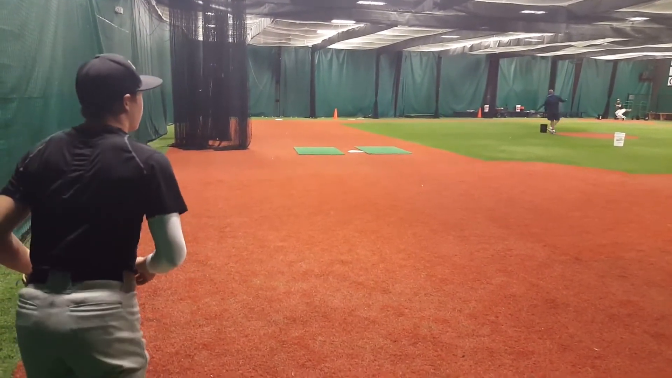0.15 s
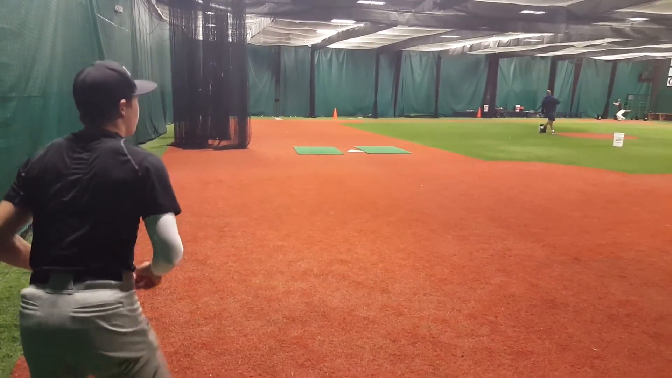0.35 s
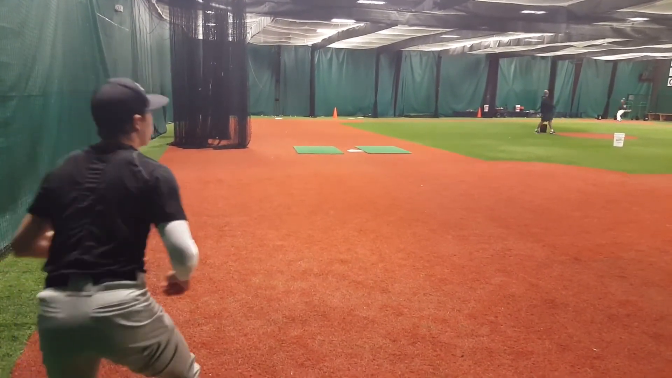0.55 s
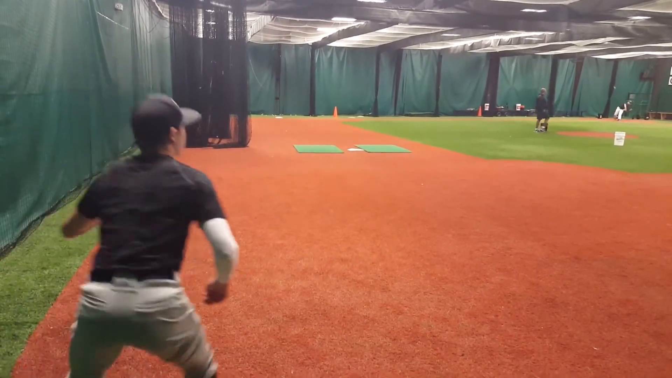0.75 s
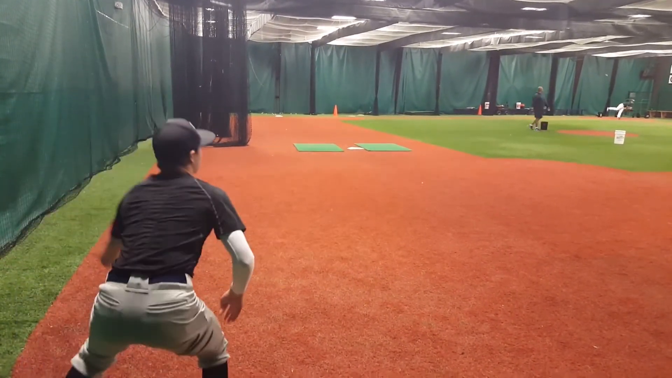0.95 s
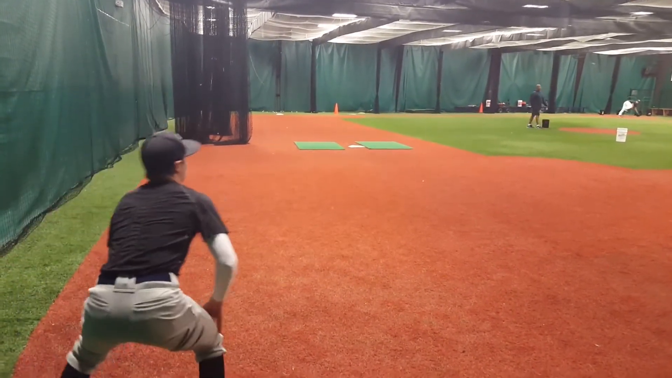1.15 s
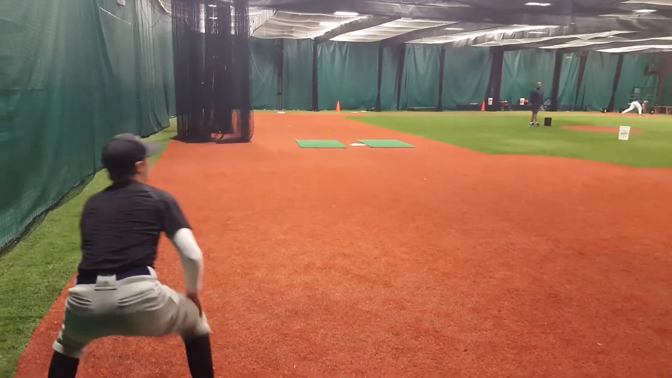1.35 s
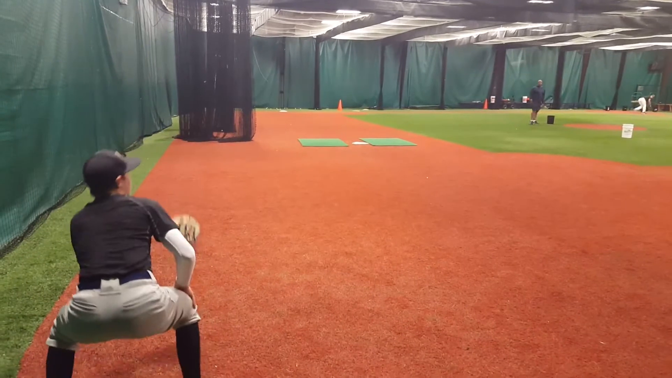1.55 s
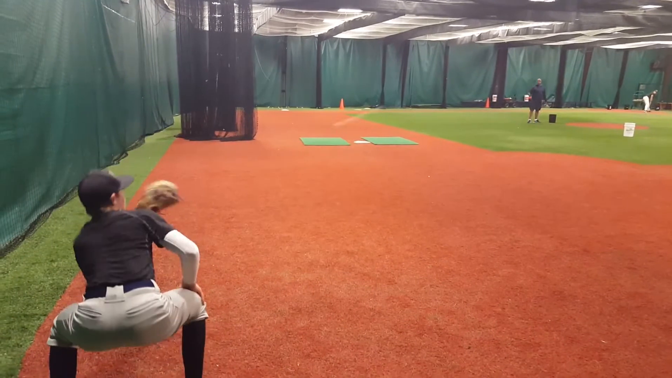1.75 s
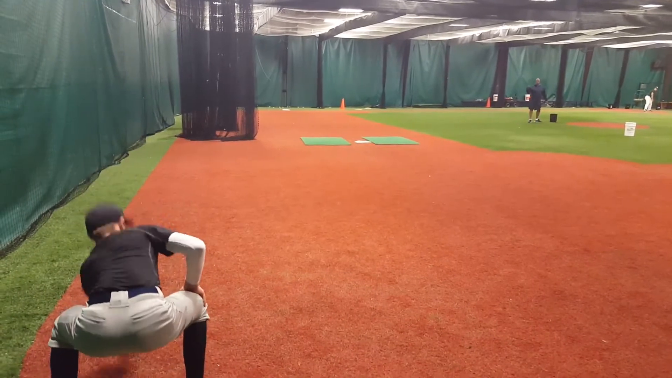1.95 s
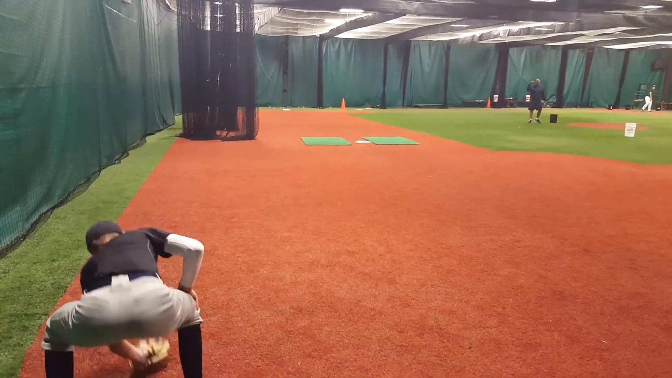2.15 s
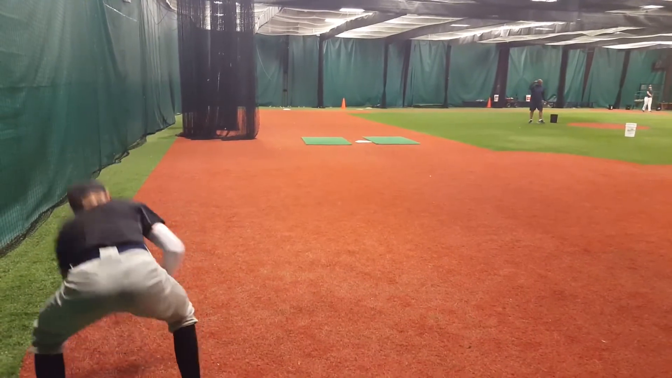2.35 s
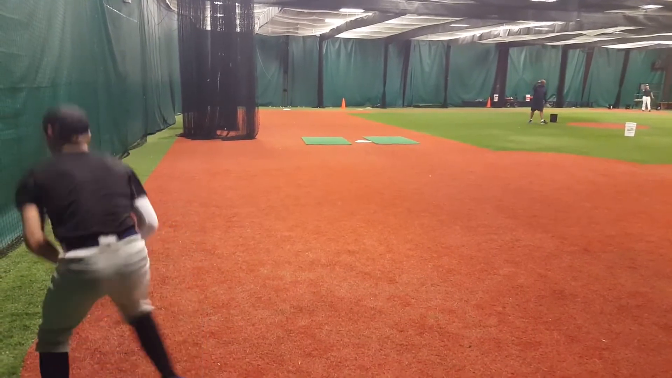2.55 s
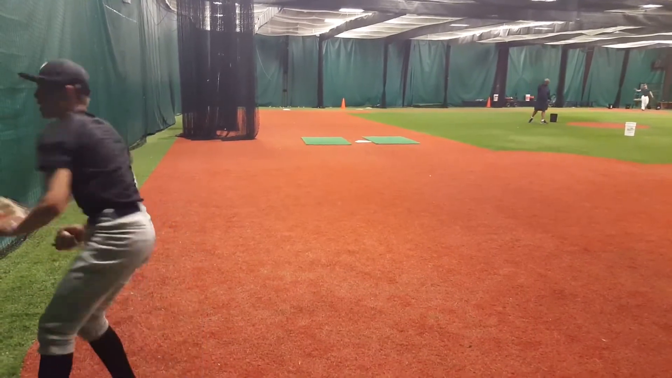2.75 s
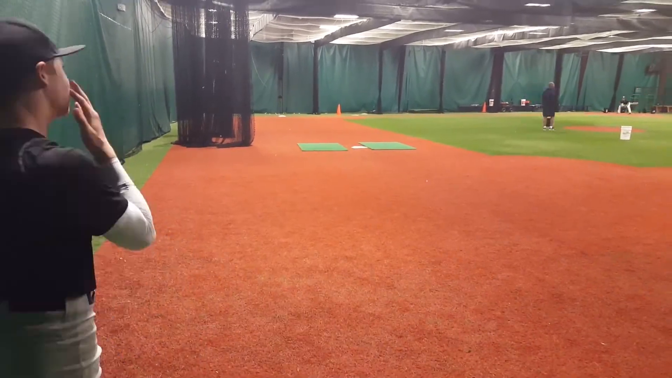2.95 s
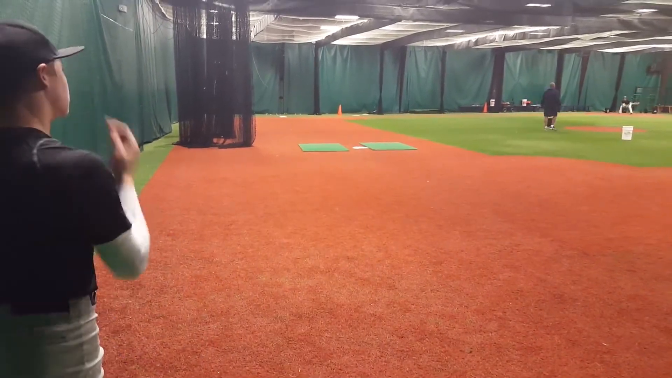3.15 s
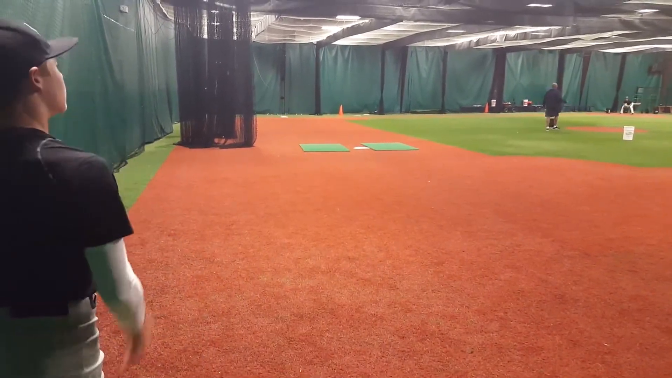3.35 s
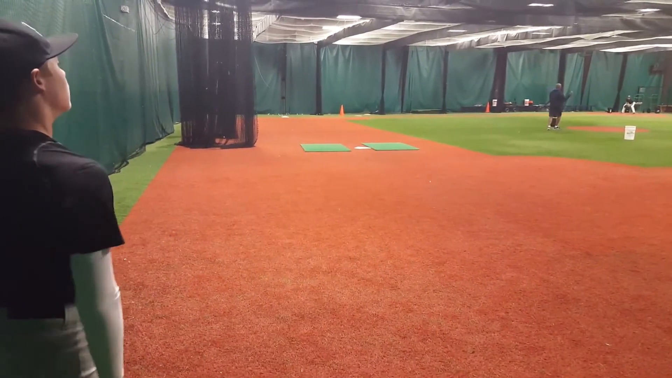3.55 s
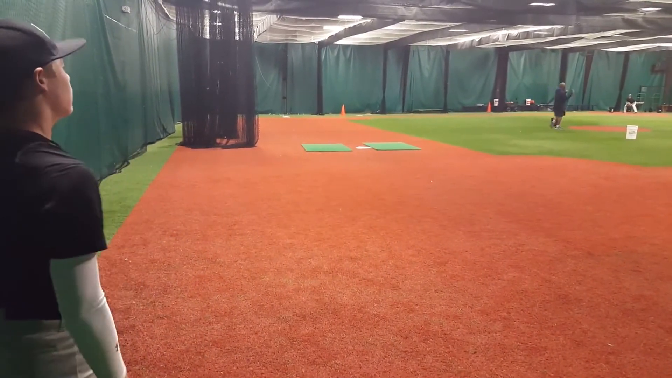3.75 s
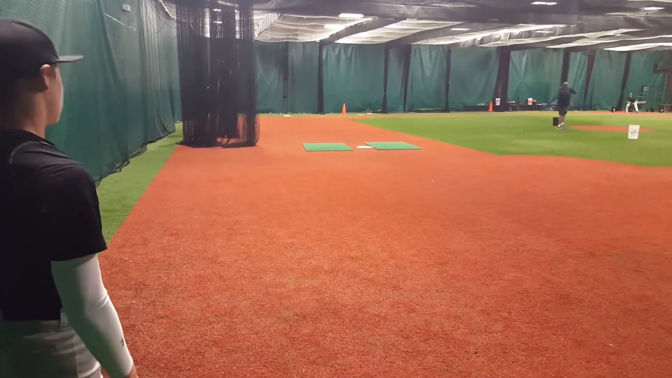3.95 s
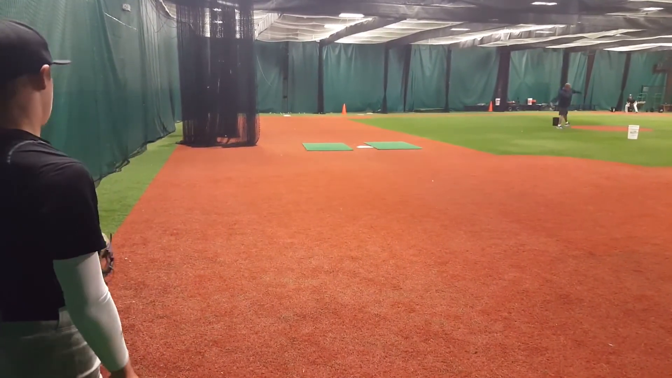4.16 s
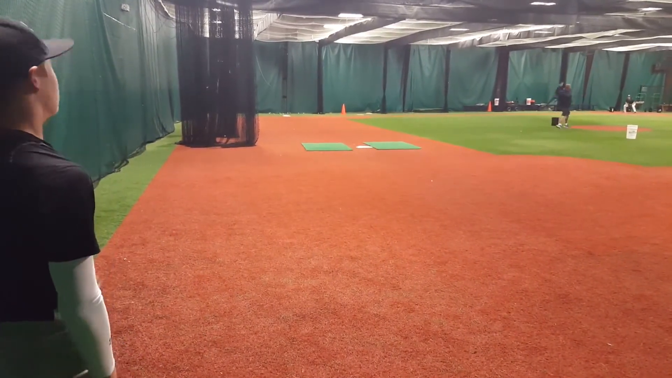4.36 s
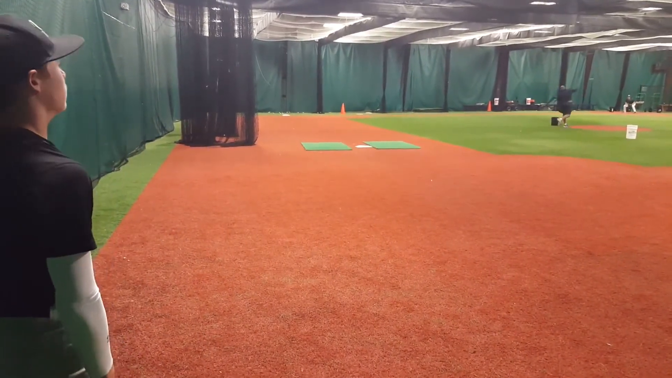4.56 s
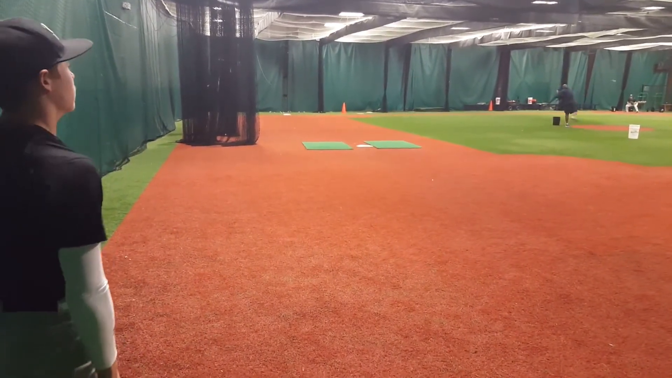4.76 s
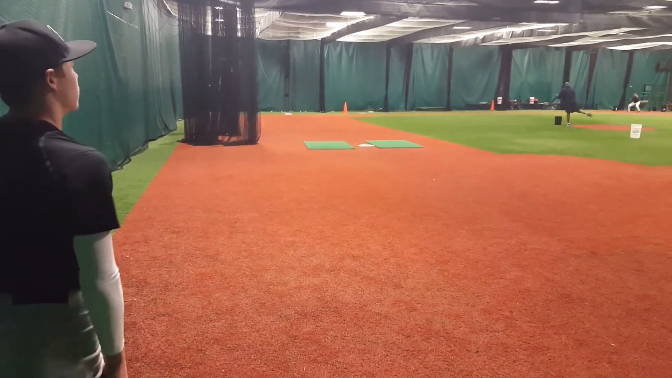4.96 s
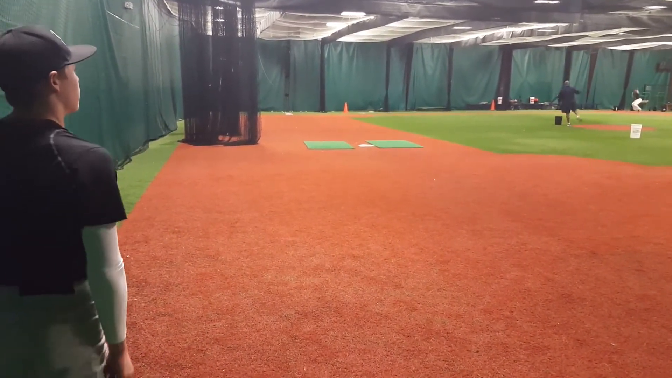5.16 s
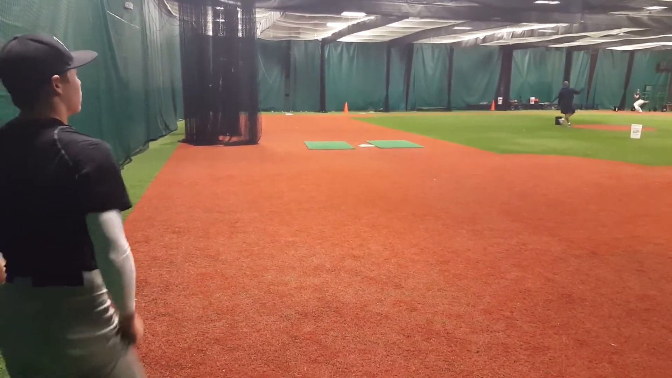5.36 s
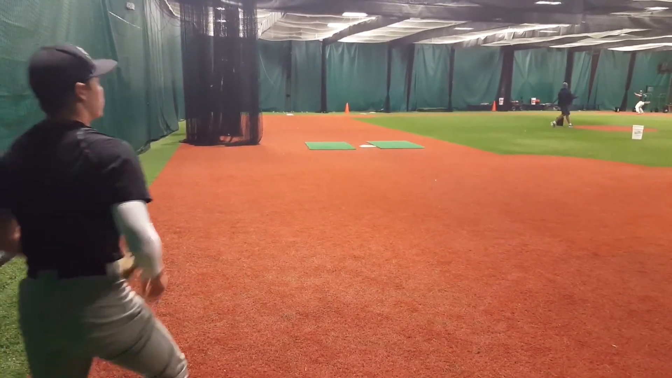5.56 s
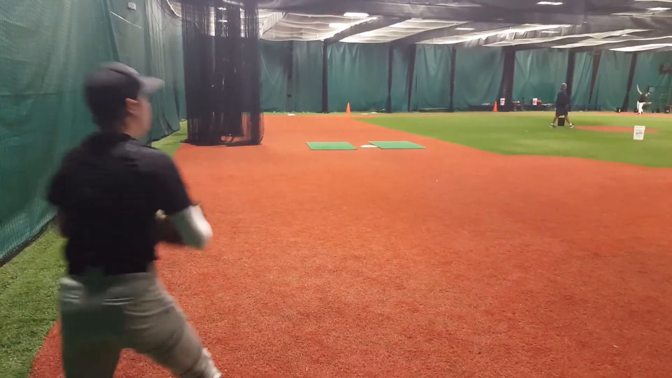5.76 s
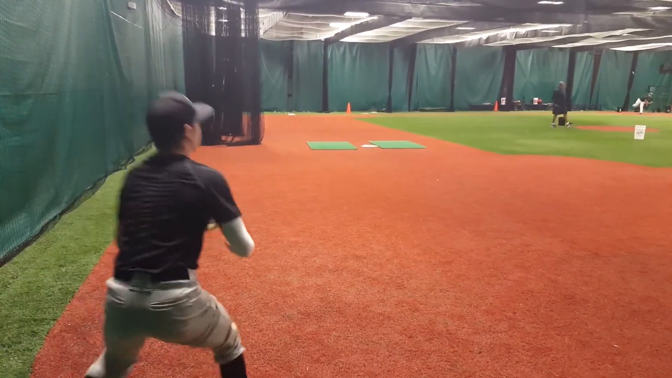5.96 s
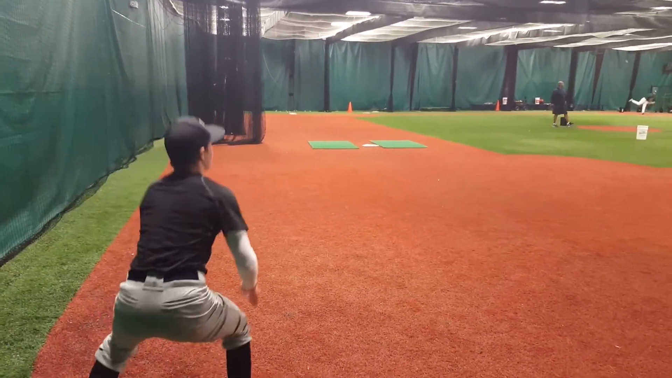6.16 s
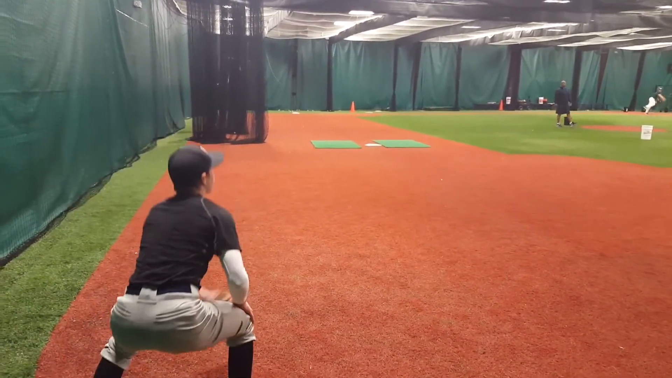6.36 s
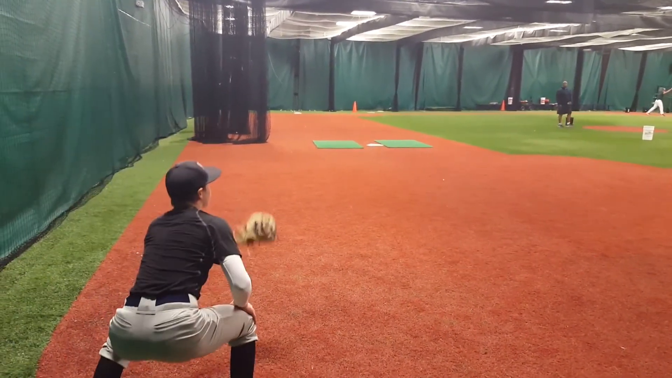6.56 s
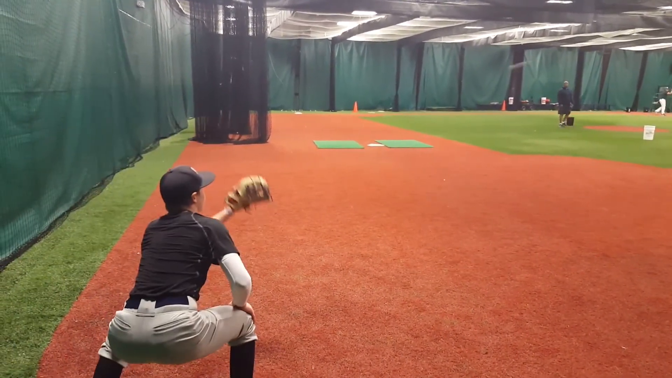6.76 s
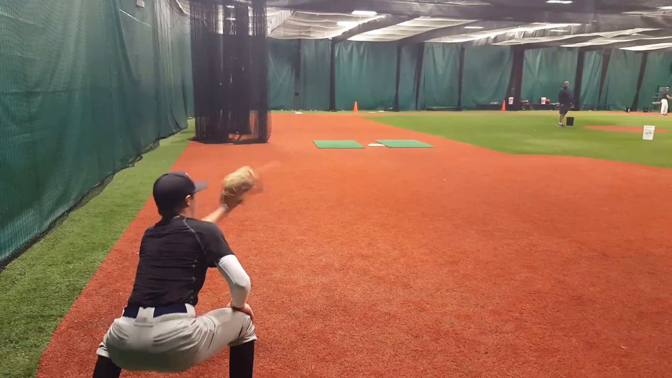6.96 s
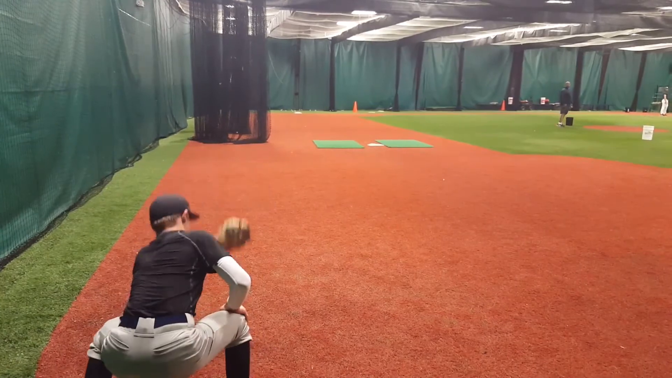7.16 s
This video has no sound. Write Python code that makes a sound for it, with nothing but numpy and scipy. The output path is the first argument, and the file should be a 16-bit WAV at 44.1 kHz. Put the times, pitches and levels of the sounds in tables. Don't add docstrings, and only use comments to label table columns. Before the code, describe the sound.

A distant ball pops into a leather glove and echoes through a long indoor hall. Shoes scuff turf, then a much louder smack hits the close glove, slapping back off the walls. An engine outside climbs faintly over the fan rumble. Another far pop and quick footwork follow, then a hissing ball cracks into the near glove. A phone beside the player captures it, its noise gate opening and closing.

```python
import sys
import numpy as np
from scipy import signal
from scipy.io import wavfile
from scipy.ndimage import uniform_filter1d

SR = 44100
rng = np.random.default_rng(int(sys.argv[2]) if len(sys.argv) > 2 else 0)


def wav_out(sig):
    wavfile.write(sys.argv[1], SR, np.round(np.clip(np.atleast_2d(sig).T, -1, 1) * 32767).astype(np.int16))


def rack_gain(trim_db):
    fader = np.asarray(trim_db, float)
    return 10 ** (fader / 20)


N = 317961

# (frequency [Hz], level difference [dB])
HALL_PAN = [(35, 11), (60, 5), (110, -1.5), (200, 4.5), (380, 0), (700, 1.5), (1290, 0), (2380, -0.5),
            (4970, -3.5), (7180, -4), (8600, 9.5), (10400, 16), (12500, 9), (15000, 4)]


def evened(x):
    return x / np.sqrt(np.mean(x ** 2) + 1e-20)


def smoothed(x, size):
    return uniform_filter1d(uniform_filter1d(x, size=size), size=size)


def read(points, hz):
    f, value = np.transpose(points)
    return np.interp(np.log(hz + 1), np.log(f + 1), value)


def unit(points, hz):
    return evened(rack_gain(read(points, hz)))[:, None]


def add(mix, s, sound):
    part = mix[:, round(s * SR):][:, :sound.shape[1]]
    part += sound[:, :part.shape[1]]


def panned(x, db):
    return x * rack_gain(np.array([[db / 2], [-db / 2]]))


def resonate(x, hz, width):
    pole = np.exp((-np.pi * width + 2j * np.pi * hz) / SR)
    return 2 * signal.lfilter([1 - abs(pole)], [1, -pole], x).real


def resonate_twice(x, hz, width):
    return resonate(resonate(x, hz, width), hz, width)


def filtered(x, order, hz, kind="low"):
    return signal.sosfilt(signal.butter(order, hz, kind, fs=SR, output="sos"), x)


def noise(magnitude, length, same, pan, patchy_db, size):
    hop = size // 4
    hz = np.fft.rfftfreq(size, 1 / SR)
    t = np.arange(length // hop + 5) * hop / SR
    a, b, c, d, patches = rng.standard_normal((len(t), len(hz), 5)).T
    patches = uniform_filter1d(patches, size=5, axis=0)
    patches = evened(uniform_filter1d(patches, size=6, axis=1))
    like = np.clip(read(same, hz), -1, 1)[:, None]
    left = a + 1j * b
    right = like * left + np.sqrt(1 - like ** 2) * (c + 1j * d)
    z = np.array([left, right])
    z *= rack_gain(np.outer([.5, -.5], read(pan, hz)))[:, :, None] * rack_gain(patchy_db * patches)
    z *= magnitude(hz, t) / np.sqrt(size * 0.72)
    return signal.istft(z, nperseg=size, noverlap=size - hop)[1][:, :length]


def gate_opening(t, opens, shuts, closing):
    return np.clip(np.minimum((t - opens) / 0.15, 1 + (shuts - t) / closing), 0, 1)


def flight(t, thrown, caught, db):
    fade_in_s, far_db, silent_db = 0.069, -11, -25.5
    rise_db = np.interp(t, [thrown, thrown + fade_in_s, caught], [silent_db, far_db, 0])
    return rack_gain(db + rise_db) * (t < caught)


def vent():
    # (time [s], level [dB])
    whistle_level = [(3.03, -100), (3.06, -80), (3.24, -79), (3.3, -92), (3.4, -82), (3.55, -80),
                     (3.7, -100)]
    grip_db = -79
    air = rng.standard_normal((4, N))
    whistle_db = np.interp(np.arange(N) / SR, *np.transpose(whistle_level))
    whistle = evened(resonate_twice(air[:2], 4800, 120)) * rack_gain(whistle_db)
    tremor = evened(resonate_twice(air[2:], 26, 33))
    grip = evened(smoothed(air[0], 9000))
    return whistle + rack_gain(grip_db + 3.6 * grip) * panned(tremor, 3.6)


def fans():
    # (frequency [Hz], density [dB per Hz])
    rumble_colour = [(12, -49), (20, -27.5), (91, 2.5), (145, 2), (158, -10), (278, -7), (386, -16),
                     (455, -17.5), (552, -27.5), (700, -18), (910, -46.5), (1540, -120)]
    air_colour = [(240, -33.5), (400, -2), (715, -8), (772, -5.5), (900, -6.5), (1420, -12), (2250, -12),
                  (3410, -19), (5150, -17.5), (8530, -31), (13700, -32), (14600, -40), (15500, -65.5)]
    seam_colour = [(880, -31.5), (1500, 1), (1790, -17), (2200, -3.5), (2860, -8), (3700, -13), (6070, -5),
                   (8210, -18.5), (12300, -11.5), (13700, -24.5), (15500, -49)]
    hiss_colour = [(290, -35.5), (500, -17), (792, -12), (839, -0.5), (1090, -7.5), (1990, -10.5),
                   (5830, -20.5), (11100, -24), (13800, -24.5), (15500, -42)]
    # (frequency [Hz], correlation [-1 to 1])
    fan_same = [(60, 0.94), (180, 0.92), (550, 0.63), (1650, -0.001), (4970, 0.07), (15000, -0.3)]
    # (frequency [Hz], level difference [dB])
    fan_pan = [(60, 2.5), (130, 2.5), (290, 2.5), (640, 3), (1410, -1), (3100, -1.5), (6820, -3.5),
               (15000, 14.5)]
    # (opens [s], shuts [s], closing time [s], air let through [dB], rumble lift [dB])
    gate_spells = [(0.348, .9, 0.4, -56, 0.6), (0.91, 1.6, 0.68, -56, 4.5),
                   (2.296, 2.963, 0.033, -60.5, 3.5), (2.901, 3.501, 1, -65.5, 1),
                   (4.36, 4.598, 0.84, -60.5, 0.5), (5.498, 6.077, .04, -55, 3), (5.9, 6.4, 0.94, -59, 2),
                   (6.746, 7.301, 0.11, -62, 4)]
    # (thrown [s], caught [s], level at the glove [dB])
    throws = [
        (1.027, 1.939, -58.5),
        (1.1, 1.56, -63.5),
        (6.2, 7.075, -63.5),
    ]
    rumble_db, air_shut_db, gate_depth_db, hiss_db = -56.5, -77.5, 9.5, -67.5
    hum_hz, hum_db = 361, -71.5

    def magnitude(hz, t):
        opening = np.array([gate_opening(t, *spell[:3]) for spell in gate_spells])
        open_air_db, lift_db = np.transpose(gate_spells)[3:, :, None]
        rumble = unit(rumble_colour, hz) * rack_gain(rumble_db + (lift_db * opening).max(axis=0))
        air_db = open_air_db - gate_depth_db * (1 - opening)
        air_db = air_db.max(axis=0, where=opening > 0, initial=-99)
        air = unit(air_colour, hz) * rack_gain(np.maximum(air_db, air_shut_db))
        ball = unit(seam_colour, hz) * sum(flight(t, *throw) for throw in throws)
        hiss = unit(hiss_colour, hz) * rack_gain(hiss_db)
        return np.sqrt(rumble ** 2 + air ** 2 + ball ** 2 + hiss ** 2)

    waver = 0.15 * evened(resonate(rng.standard_normal(N), hum_hz, 5.0))
    hum = evened(np.sin(2 * np.pi * hum_hz * np.arange(N) / SR) + waver)
    return noise(magnitude, N, fan_same, fan_pan, patchy_db=0.0, size=1024) + rack_gain(hum_db) * hum


def engine():
    # (time [s], lower order [Hz])
    speed = [(2.7, 62), (3.1, 66), (4.0, 83), (4.55, 99), (5.0, 113), (5.7, 120), (6.3, 116), (6.7, 113),
             (7.3, 104)]
    # (frequency [Hz], level [dB])
    wall = [(62, -83.5), (83, -57.5), (99, -67.5), (114, -57), (124, -52.5), (138, -50), (147, -64),
            (200, -65)]
    order_ratio, upper_order_db = 5 / 3, -2
    arrives_s, swell_s = 2.65, 0.7
    t = np.arange(N) / SR
    hz = np.interp(t, *np.transpose(speed))
    low_db = read(wall, hz)
    high_db = read(wall, hz * order_ratio) + upper_order_db
    drift = smoothed(rng.standard_normal((4, N)), 2500)
    drift /= drift.std()
    turns = np.cumsum(hz) / SR
    low = rack_gain(low_db + 1.2 * drift[0]) * np.sin(2 * np.pi * turns + .5 * drift[1])
    high = rack_gain(high_db + 1.3 * drift[2]) * np.sin(2 * np.pi * turns * order_ratio + 0.4 * drift[3])
    swell = np.clip((t - arrives_s) / swell_s, 0, 1)
    return panned(np.sqrt(2) * (low + high) * swell, 2.5)


def scuff(scrape_db, thud_db, rustle_db):
    # (frequency [Hz], width [Hz], level [dB])
    port_modes = [(5840, 6100, 10.5), (10900, 3600, 13)]
    scrape_hz, scrape_width_hz, t60_s = 770, 1730, 0.29
    grit_per_s, grit_db = 310, 3
    t = np.arange(SR // 3) / SR
    stroke = (1 - np.exp(-t / (0.059 * t60_s + 1e-4))) * rack_gain(-60 * t / (t60_s + 0.012))
    grit = rng.standard_normal((2, len(t)))
    grit[1] = 0.34 * grit[0] + 1.2 * grit[1]
    catches = np.interp(t * grit_per_s, np.arange(len(t)), rng.standard_normal(len(t)))
    grit *= rack_gain(grit_db * catches)
    thud = filtered(grit[0], 2, (105, 306), "band")
    scrape = filtered(resonate_twice(grit, scrape_hz, scrape_width_hz), 2, 300, "high")
    rustle = sum(rack_gain(db) * resonate_twice(grit, hz, width) for hz, width, db in port_modes)
    rustle = filtered(rustle, 10, 13800)
    mixed = rack_gain(scrape_db - 8.0) * evened(scrape) + rack_gain(thud_db) * evened(thud)
    mixed = mixed + rack_gain(rustle_db + 1.5 - 120 * t) * evened(rustle)
    return panned(mixed * stroke, 2.8)


def thump(hz, db, t60=0.15):
    t = np.arange(SR // 3) / SR
    ring = np.sin(2 * np.pi * hz * t) * (1 - np.exp(-t * hz)) * rack_gain(db - 60 * t / t60)
    return panned(ring, read(HALL_PAN, hz))


def hall(row, shut, colour, late_colour):
    # (time [s], level [dB], rise [s], t60 [s])
    slaps = [(0.33, -31.5, 0.043, 0.3), (0.375, -34, 0.011, 1), (0.78, -49.5, 0.02, 1),
             (2.109, -26, 0.011, 0.61), (2.20, -31, 0.013, 0.19), (2.329, -42.5, 0.019, 0.48),
             (5.290, -23, 0.004, 0.094), (5.40, -39, 0.04, 0.94), (5.53, -53, 0.0077, 0.27)]
    # (frequency [Hz], t60 [s])
    late_t60 = [(100, 1.3), (300, 1.3), (800, 1.74), (2000, 2.1), (5000, 1.16), (12000, .7)]
    # (frequency [Hz], factor on the early t60)
    early_speed = [(100, 1.1), (500, 1.146), (2000, 1.0), (6000, 0.99), (12000, 0.62)]
    # (frequency [Hz], correlation [-1 to 1])
    wash_same = [(60, 0.8), (130, 0.9), (290, 0.93), (500, .75), (740, 0.45), (1220, -0.0091),
                 (2000, -0.17), (3100, 0.015), (6820, 0.01), (15000, -0.11)]
    # (frequency [Hz], level [dB])
    port_tone = [(3000, -0.5), (6500, 1.5), (7600, -2), (9000, -4.5), (11200, 1), (13600, 5), (15500, 8)]
    pile_up_s = .014
    s, early_db, held, t60, late_db = row

    def magnitude(hz, t):
        speed = read(early_speed, hz)[:, None]
        early = unit(colour, hz) * rack_gain(early_db - 60 * np.maximum(t - held, 0) / (t60 * speed))
        late = rack_gain(late_db - 60 * t / read(late_t60, hz)[:, None]) ** 2
        for at, db, rise, ring in slaps:
            since = t + s - at
            if s < at < shut:
                decay = rack_gain(db - 60 * np.maximum(since - rise, 0) / (ring * speed))
                late = late + (np.clip(since / rise, 0, 1) * decay) ** 2
        gate = rack_gain(np.interp(t + s - shut, [0, .02, .4], [0, -9, -40]))
        power = early ** 2 + unit(late_colour, hz) ** 2 * late
        return np.sqrt(power) * gate * rack_gain(read(port_tone, hz))[:, None]

    wash = noise(magnitude, round(1.6 * SR), wash_same, HALL_PAN, patchy_db=1.5, size=1024)
    wash = filtered(wash, 4, 70, "high")
    return wash * np.minimum(np.arange(wash.shape[1]) / SR / pile_up_s, 1)


def smack(db, pocket_hz, crack_db, lag_ms):
    rise_s, crack_late_s = .0004, .0006
    far = lag_ms < -.08
    crack_hz = 4600 if far else 5700
    top_hz = 8000 if far else 15000
    port_lag_s = np.array([[max(-lag_ms, 0)], [max(lag_ms, 0)]]) / 1000
    t = np.maximum(np.arange(800) / SR - port_lag_s, 0)
    overtone = rack_gain(-2.5 - 60 * t / 0.024) * np.sin(2 * np.pi * 1.85 * pocket_hz * t)
    pocket = np.sin(2 * np.pi * pocket_hz * t) + overtone
    pocket *= -(1 - np.exp(-t / 0.0012)) * rack_gain(-60 * t / 0.014)

    ticks = rng.standard_normal(800)
    t = np.maximum(t - crack_late_s, 0)
    spray = np.array([np.interp(side * SR, np.arange(800), ticks) for side in t])
    spray *= t / rise_s * np.exp(-t / rise_s) + .25 * np.exp(-t / .0012) * (t > 0)
    crack = resonate_twice(spray, crack_hz, 2300)
    crack = crack + rack_gain(-29) * resonate(resonate(spray, 10000, 5000), 8500, 5000)
    laces = np.sin(2 * np.pi * crack_hz * t) * t / rise_s * np.exp(1 - t / rise_s / 2) / 2
    crack = filtered(crack / abs(crack).max() + 0.15 * laces, 4, top_hz)

    whistle = resonate_twice(spray, 11300, 1900) * rack_gain(np.array([[3], [-22]]))
    upper = resonate_twice(spray, 13000, 3000) * rack_gain(np.array([[2.5], [-15]]))
    whistle = whistle + rack_gain(-13) * upper
    whistle_db = crack_db - 23.5 + 50.5 * lag_ms
    leather = rack_gain(crack_db) * crack / abs(crack).max()
    return rack_gain(db) * (pocket + leather + rack_gain(whistle_db) * whistle / abs(whistle).max())


def scene():
    # (time [s], scrape [dB], thud [dB], rustle [dB])
    scuffs = [(0.787, -59.5, -78, -61), (0.859, -60, -69, -64), (0.934, -66, -36.5, -84),
              (1.128, -66, -47.5, -78), (1.189, -51, -50.5, -87), (1.39, -44.5, -48.5, -81),
              (1.497, -50, -51, -59), (1.576, -33, -41.5, -56), (2.619, -49, -68, -57.5),
              (2.798, -41, -49, -50.5), (2.911, -52, -73, -83.5), (4.47, -52, -60, -70),
              (4.698, -45.5, -46, -59), (4.772, -48.5, -55.5, -61), (5.519, -33.5, -37.5, -57),
              (5.84, -35.5, -44, -58), (5.979, -41, -43.5, -53.5), (6.254, -30.5, -74, -49.5),
              (6.308, -41.5, -55, -59)]
    # (time [s], frequency [Hz], level [dB])
    footfalls = [(.16, 314, -58), (.375, 63, -32.5), (.79, 325, -47), (.934, 317, -40.5),
                 (.975, 243, -36.5), (.99, 171, -43), (1.13, 284, -46), (1.39, 120, -41), (1.51, 322, -43),
                 (1.53, 111, -33.5), (1.72, 331, -47), (2.81, 458, -48), (5.29, 189, -32.5),
                 (5.85, 456, -45.5), (6.268, 555, -41.5)]
    # (time [s], frequency [Hz], level [dB], t60 [s])
    knocks = [(1.9428, 4840, -24, 0.0099), (1.9524, 2120, -6, 0.005), (1.9524, 3420, -13, .006),
              (1.9526, 4300, -18, .005), (1.9465, 5020, -27, .02), (1.9775, 1210, -19, .03),
              (.1785, 3760, -29.5, 0.034), (.2045, 2900, -30, 0.014), (.2110, 2290, -28, .02),
              (5.2445, 1490, -25, 0.018), (5.2535, 6500, -37.5, .03), (5.2985, 2800, -31, .01),
              (5.8428, 480, -31, .02), (6.261, 440, -38, 0.026), (4.57, 2080, -65, .12),
              (4.51, 896, -64, .12), (4.53, 1100, -64, .1), (4.51, 620, -63, .1), (1.582, 1200, -46, .03),
              (1.583, 130, -38, .12), (1.604, 1100, -47, .04), (.1965, 605, -26, 0.017),
              (4.700, 2100, -62, 0.13), (4.700, 6200, -62, .02), (4.775, 6700, -61, 0.045),
              (4.775, 690, -57, .08), (5.2600, 402, -25, 0.023), (5.8421, 1030, -23.5, .016),
              (5.846, 230, -36, 0.092), (5.848, 330, -37, .07), (5.8545, 2000, -39, .02),
              (6.258, 900, -40, 0.022), (6.272, 443, -35.5, .05), (6.2768, 810, -34, 0.026),
              (6.3062, 840, -34, .02), (7.0849, 1350, 2, .005), (7.0852, 1870, -6, .015),
              (7.085, 13800, -20, .005), (7.0915, 4400, -18, .012), (7.0852, 6400, -13, 0.01)]
    # (time [s], frequency [Hz], level [dB], t60 [s])
    further_knocks = [(.1795, 1150, -24, .02), (.184, 1650, -31, .04), (.190, 4000, -33, .02),
                      (.2025, 980, -25, .03), (.233, 2050, -32, .03), (.241, 2950, -35, .03),
                      (.268, 740, -31, .06), (.372, 1650, -40, .04), (.385, 1000, -37, .08), (.46, 740, -39, .2),
                      (1.951, 480, -17, .025), (1.9755, 1600, -18, .03), (1.978, 1000, -15, .05),
                      (1.990, 480, -17, .06), (1.996, 2100, -21, .04), (2.11, 2000, -27, .04),
                      (2.12, 950, -28, .06), (2.15, 1000, -26, .07), (2.13, 2350, -32, .06),
                      (2.812, 1180, -51, .08), (2.83, 700, -55, .1), (5.245, 190, -21, .05),
                      (5.2525, 2530, -26, .04), (5.26, 170, -26, .05), (5.305, 700, -30, .05),
                      (5.41, 150, -33, .05), (5.43, 920, -38, .12), (5.535, 650, -38, .06),
                      (7.0846, 15600, -18, .004), (7.085, 3200, -10, .006), (7.091, 2100, -16, .015),
                      (7.096, 1150, -17, .02), (7.106, 300, -19.5, .05), (7.108, 2150, -18, .025),
                      (7.109, 4900, -22, .02), (7.114, 940, -12, .05), (7.128, 2900, -22, .02),
                      (7.136, 850, -18, .1), (7.158, 500, -22, .04), (7.16, 1250, -24, .05),
                      (7.186, 800, -23, .05)]
    # (time [s], early wash [dB], held [s], early t60 [s], late wash [dB])
    pops = [
        (0.1788, -23, 0.034, 0.5, -38),
        (1.9428, -14, 0.02, 0.45, -29.5),
        (5.2422, -25, 0.0096, 0.39, -30),
        (7.086, -16.5, 0.04, 0.3, -52),
    ]
    gate_shuts = [1.05, 2.98, 6.07, 7.5]
    # (frequency [Hz], density [dB per Hz])
    early_colours = [
        [(29, -49), (50, -12), (201, -2), (295, -12.5), (341, -1.5), (434, -10.5), (913, -5.5), (1340, -15.5),
         (2170, -16.5), (5520, -23.5), (12200, -42), (14000, -55), (15500, -70)],
        [(29, -56.5), (50, -23.5), (103, -11), (385, -6), (455, -3.5), (771, -8), (1000, -2), (1880, -6.5),
         (2110, -6), (3580, -17.5), (12200, -34.5), (14500, -48), (15500, -60.5)],
        [(29, -45), (50, -19), (85, -19), (183, 2.5), (317, -15.5), (913, -3), (1700, -11.5), (2560, -8.5),
         (3950, -19.5), (5140, -17.5), (11600, -42), (14000, -54), (15500, -70)],
        [(29, -78), (50, -41), (144, -6.5), (262, -13), (303, -4.5), (607, -8), (760, -3), (880, 2.5),
         (1050, -5), (1250, -3), (1920, -8.5), (3580, -10), (6230, -17.5), (12500, -31), (15500, -48)],
    ]
    # (frequency [Hz], density [dB per Hz])
    late_colours = [
        [(71, -47), (120, -21), (186, 0.5), (256, -7.5), (474, -8), (567, -10), (679, -1), (991, -1),
         (1340, -10.5), (2740, -13.5), (5600, -24.5), (7260, -33.5), (14000, -61)],
        [(88, -37.5), (150, -4), (309, -10), (352, -10), (515, -6), (577, -16), (698, -5.5), (860, -4),
         (1000, 1), (1130, -4), (1250, -6.5), (1600, -4.5), (1800, -9), (2120, -2.5), (2450, -10.5),
         (2750, -8.5), (3250, -16.5), (3600, -21), (6300, -26.5), (7400, -41), (14000, -53.5)],
        [(59, -35), (100, -3), (123, -4.5), (158, -4.5), (194, -3.5), (332, -15), (383, -11), (895, -7),
         (1270, -13.5), (2790, -19), (6510, -32), (7370, -40), (14000, -54.5)],
    ]
    # (frequency [Hz], level [dB], t60 [s])
    far_glove = [(108.2, -9.5, 0.21), (189, -6, 0.25)]
    near_glove = [(35, -27.5, .1), (104.2, -13, 0.17), (280, -5, 0.12), (455.3, -5, 0.16)]
    last_glove = [(45, -18, .08), (80, -3.5, 0.075), (307.6, -6, 0.15), (470, -12, 0.35)]
    # (time [s], peak [dB], pocket ring [Hz], crack over the ring [dB], right port late by [ms])
    arrivals = [(.1779, -18, 730, -6, -0.22), (.1797, -9, 1044, -12.5, -.2),
                (.1830, -24.5, 890, 7.5, -0.57), (.1900, -21, 880, 3.5, -.1), (0.1957, -26, 600, -6, -0.25),
                (.2310, -18, 876, -16, -0.34), (1.9430, -10, 860, -8.5, .1), (1.9466, 1.5, 1070, -37, 0.18),
                (1.9519, -12, 1300, -9, 0.58), (1.9592, -15, 915, -5, 0.46),
                (1.9954, -18, 1140, -21.5, -0.16), (5.2436, -18, 900, -11.5, -0.2),
                (5.2480, -14, 950, -20, -0.16), (5.2530, -14, 1600, -29, -0.21),
                (5.2905, -11, 900, -29, -0.21), (5.2960, -15, 805, -19, -0.22),
                (5.2983, -16, 1500, -7, -0.293), (5.8439, -45, 1030, 7.5, -.01),
                (5.8533, -34, 1196, -6, 0.0), (7.0844, 1, 947, -6, 0.02), (7.0900, -10, 1300, -2, 0.58),
                (7.1000, -16, 1130, -4, 0.4), (7.1075, -15, 1250, -3, 0.1), (7.1130, -20, 970, 0, 0.012)]
    flutter_db = 1

    mix = fans() + vent() + engine()
    wash = np.zeros((2, N))
    gloves = [far_glove, near_glove, far_glove, last_glove]
    lates = late_colours + late_colours[1:2]
    for row, shut, colour, late, glove in zip(pops, gate_shuts, early_colours, lates, gloves):
        add(wash, row[0], hall(row, shut, colour, late))
        add(mix, row[0], rack_gain(row[1]) * sum(thump(*mode) for mode in glove))
    layers = ((scuffs, scuff), (footfalls, thump), (knocks, thump), (further_knocks, thump), (arrivals, smack))
    for table, source in layers:
        for s, *rest in table:
            add(mix, s, source(*rest))
    flutter = evened(smoothed(rng.standard_normal(N), 90))
    return mix + wash * rack_gain(flutter_db * flutter)


def top_cut(x):
    return signal.sosfilt(signal.butter(12, 16840, fs=SR, output="sos"), x)


def record(dry):
    hz, _, z = signal.stft(np.clip(dry, -1, 1), SR, nperseg=512)
    level_db = 10 * np.log10(4 / 3 * (abs(z) ** 2).sum(axis=1).mean(axis=0) + 1e-12)
    edge = 14200 + 115 * np.maximum(level_db + 24, 0) + 800 * np.maximum(level_db + 13, 0)
    z = z * (hz[:, None] < np.minimum(edge, 16800))
    rolled = signal.istft(z, SR, nperseg=512)[1][:, :N]
    return top_cut(rolled - .0005)


dry = scene()
out = record(dry)
wav_out(out)
```